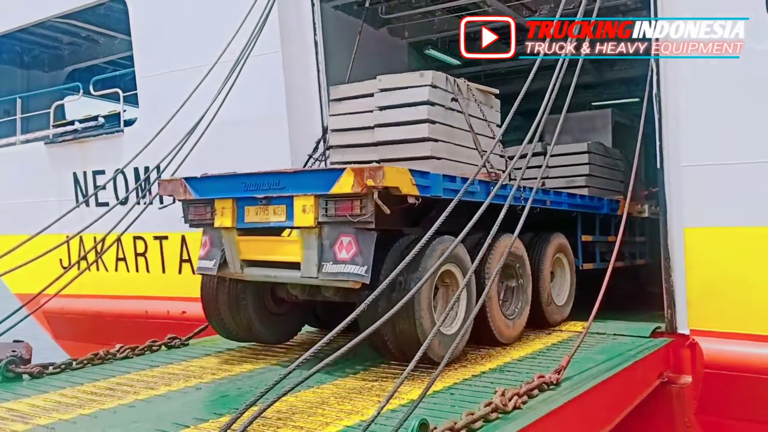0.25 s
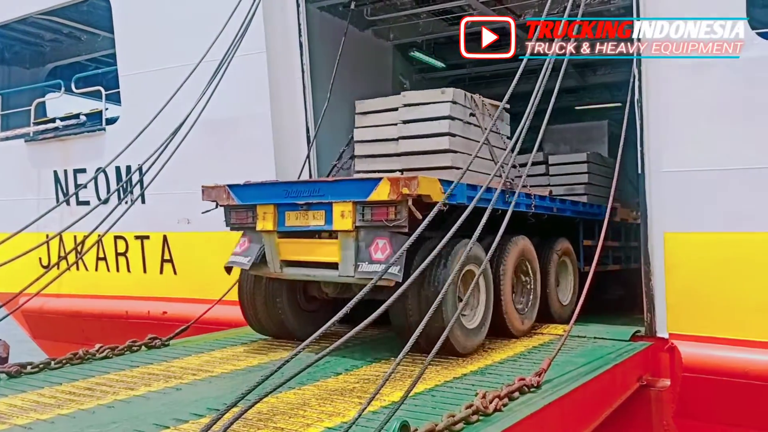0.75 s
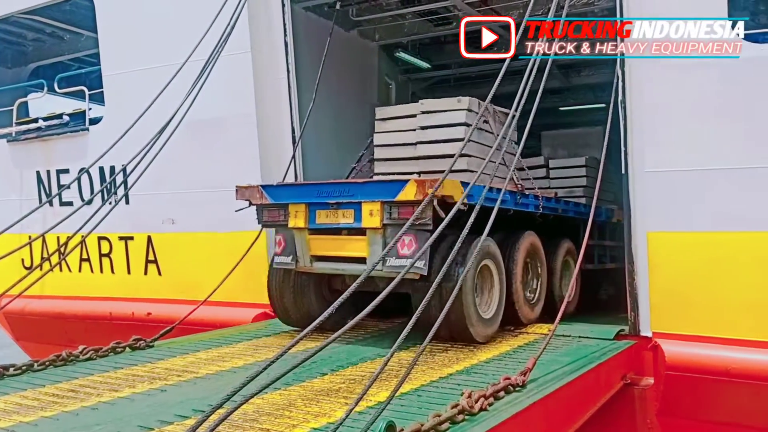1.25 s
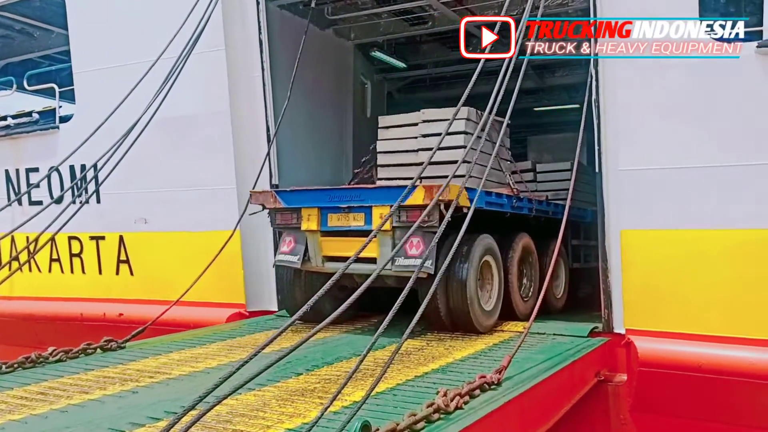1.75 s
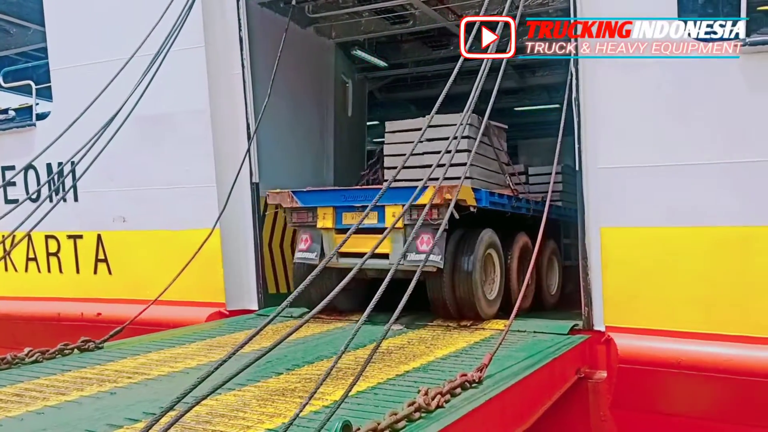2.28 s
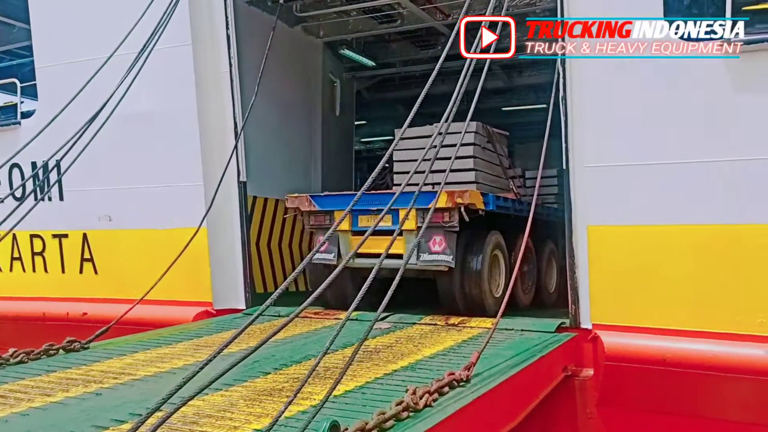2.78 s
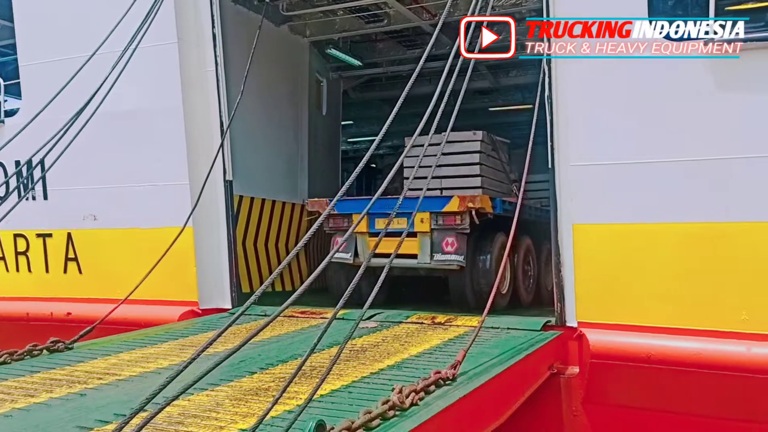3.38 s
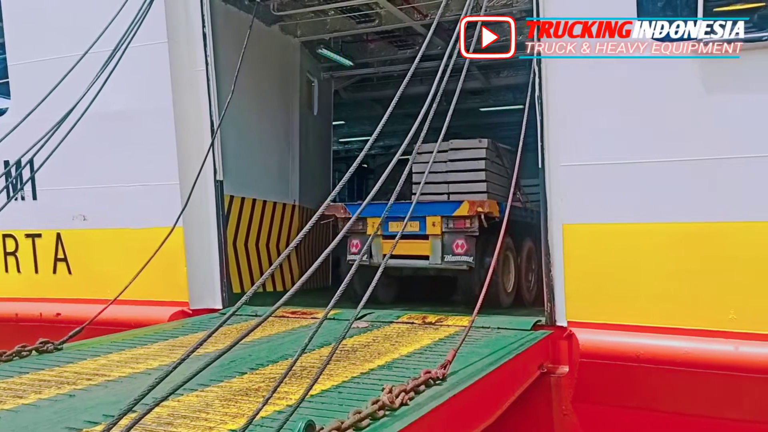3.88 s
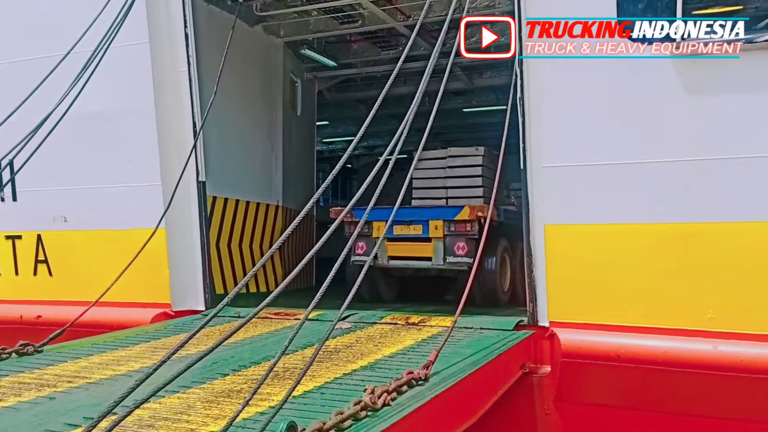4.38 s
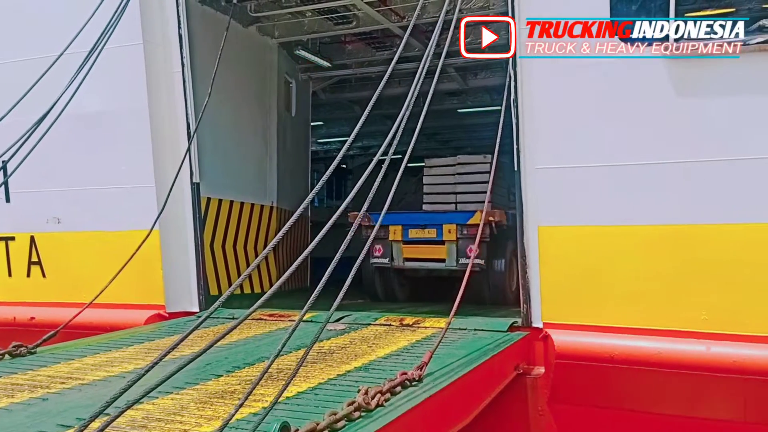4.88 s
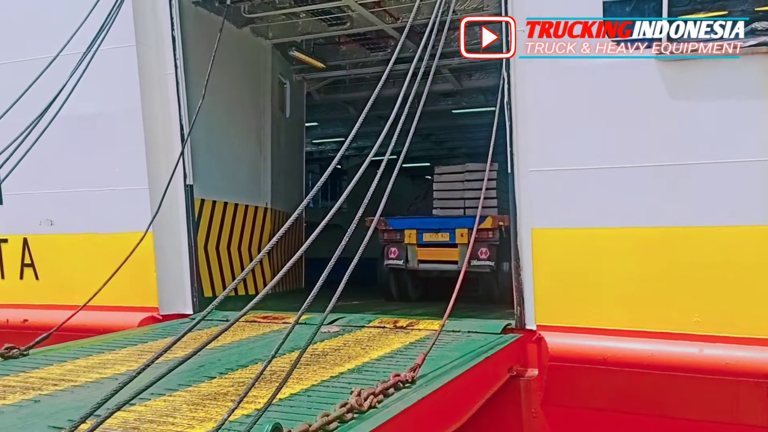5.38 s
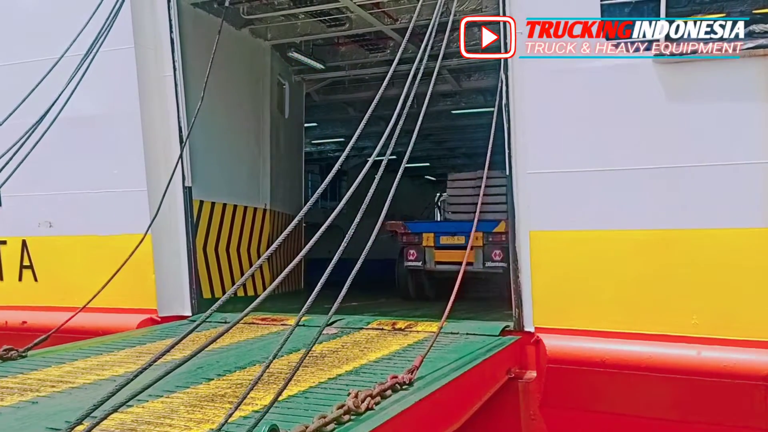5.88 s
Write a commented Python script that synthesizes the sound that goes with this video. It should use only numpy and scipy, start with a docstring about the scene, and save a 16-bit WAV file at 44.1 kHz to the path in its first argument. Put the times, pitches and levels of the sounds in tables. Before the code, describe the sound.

A loaded trailer rolls up a ribbed steel ramp into a ferry hold, heard close in stereo. A hollow low boom and rough tyre roar continue throughout. From 0.2 to 0.65 s loose plates slam, bounce and ring over a tyre thud, with light chain jangle. Around 1.0-1.9 s deep thuds mix with quick dry plate knocks, mostly left, and tiny steel squeals. A bright clang and chains strike near 1.9-2.1 s. From 2.4 to 3.3 s the rattle is densest, over heavy thumps. Then it thins: a big thud at 3.6, a few knocks around 4.3-4.5 with a short chain clink, and strong thuds until 5.0. A diesel clatters faintly behind, gradually quickening, clearer around 5.5 s with a fluttering hollow air whoosh. At 5.9-6.0 s a duller double slam, scrape, chain jangle and last thud sound.

```python
"""Trailer on a ferry ramp

A loaded flatbed trailer rolls up a ribbed steel ramp into the hold of a ferry, in stereo.
Tyres thud over the ribs (shaped noise and panel tones) and keep the ramp booming (filtered noise).
Loose plates slam and ring or rattle in short runs (struck modes and chattering noise).
Steel scrapes (wavering partials), and lashing chains jangle (showers of clicks into resonances).
Behind it all a diesel clatters and slowly gathers speed (noise pulsed by the firings), with a whoosh of air."""
import sys
import numpy as np
from scipy import signal
from scipy.fft import rfft, irfft, next_fast_len
from scipy.io import wavfile
from scipy.ndimage import uniform_filter1d

SR = 44100
rng = np.random.default_rng(int(sys.argv[2]) if len(sys.argv) > 2 else 0)


def to_wav(sig):
    """Store sig (one row per channel, or 1-D mono) as 16-bit WAV at the path in sys.argv[1].

    Samples outside -1..1 are clipped; the rate is SR.
    """
    pcm = np.clip(np.atleast_2d(sig), -1, 1) * 32767
    pcm = np.round(pcm).astype(np.int16)
    wavfile.write(sys.argv[1], SR, pcm.T)  # frames by channels


N = 270774
TIME = np.arange(N) / SR


def from_db(db):
    """Decibels to gain."""
    return 10 ** (np.asarray(db) / 20)


def rms_one(x):
    """Scale to unit power."""
    return x / np.sqrt(np.mean(x ** 2) + 1e-20)


def evened(x, size=SR // 4):
    """Hold a sound at unit power, leaving only its quick flutter."""
    return x / np.sqrt(uniform_filter1d(np.mean(x ** 2, axis=0), size=size) + 1e-20)


def shaped(x, envelope):
    """Put an envelope on a sound, with the energy that it would give a steady sound of unit power."""
    return rms_one(x * envelope) * np.sqrt(np.mean(envelope ** 2))


def fade(t, rise_s, t60_s):
    """A quick swell that dies away, by 60 dB in t60_s."""
    return (1 - np.exp(-t / rise_s)) * np.exp(-np.log(1000) * t / t60_s)


def in_time(rows):
    """Each column of a breakpoint curve, read at every sample."""
    s, *columns = np.transpose(rows)
    return [np.interp(TIME, s, column) for column in columns]


def drift(rate_hz, size=N):
    """Slow chance with a spread of 1: white noise through a two-pole lowpass."""
    r = np.exp(-2 * np.pi * rate_hz / SR)
    run_in = SR // 10
    white = rng.standard_normal(size + run_in)
    return rms_one(signal.lfilter([1], [1, -2 * r, r * r], white)[run_in:])


def noise(size, alike):
    """White noise at a left and a right microphone, with a given correlation between them."""
    mid, side = rng.standard_normal((2, size))
    alike = np.clip(alike, -1, 1)
    return np.sqrt(1 + alike) * mid + np.sqrt(1 - alike) * side * np.array([[1], [-1]])


def coloured(x, spectrum, tilt_db=0):
    """Shape a sound by a spectrum, tilted per octave about 1 kHz over two octaves either way."""
    size = next_fast_len(x.shape[-1])
    octave = np.log2(np.fft.rfftfreq(size, 1 / SR) + 1)
    hz, db = np.transpose(spectrum)
    curve_db = np.interp(octave, np.log2(hz), db)
    gain = from_db(curve_db + tilt_db * np.clip(octave - 10, -2, 2))
    return irfft(rfft(x, size) * gain, size)[..., :x.shape[-1]]


def resonate(x, modes):
    """Parallel resonances (pitch_hz, width_hz, level_db) with alternating signs."""
    out = 0
    for k, (hz, width_hz, db) in enumerate(modes):
        r = np.exp(-np.pi * width_hz / SR)
        gain = (-1) ** k * from_db(db) * (1 - r * r) / 2
        poles = [1, -2 * r * np.cos(2 * np.pi * hz / SR), r * r]
        out = out + gain * signal.lfilter([1, 0, -1], poles, x)
    return out


def struck(modes, size):
    """One click into a set of modes, with a peak of 1."""
    ringing = resonate(signal.unit_impulse(size), modes)
    return ringing / np.abs(ringing).max()


def wavering(hz, wander_hz):
    """A unit-power tone on a pitch track, its phase wandering separately at each microphone."""
    turn = 2 * np.pi * np.cumsum(hz) / SR + rng.uniform(0, 2 * np.pi)
    sides = [np.sin(turn + drift(wander_hz, size=SR // 2)[:len(hz)]) for _ in range(2)]
    return rms_one(np.array(sides))


def panned(db):
    """Left and right gains of equal total power for a left minus right level."""
    ratio = from_db(np.atleast_1d(db))
    return np.array([ratio, np.ones_like(ratio)]) * np.sqrt(2 / (1 + ratio ** 2))


def add(track, start_s, sound):
    """Mix a sound in at a time."""
    at = max(0, round(start_s * SR))
    track[:, at:at + sound.shape[1]] += sound[:, :max(0, N - at)]


# a tyre drops off a rib: start_s [s], level_db [dB], pitch_hz of the ramp panel [Hz]
TYRE_DROPS = [(0.359, -9, 358), (.846, -6.5, 129.2), (.955, -5.5, 217), (1.139, -12, 358),
              (1.435, -10.5, 140.2), (1.661, -13, 187.8), (1.716, -9, 107.5), (1.925, -7, 193),
              (2.35, -6, 144.7), (2.459, -10, 114), (2.56, -5.5, 259.3), (2.72, -4.5, 108),
              (2.87, -11, 252), (3.051, -8.5, 131.3), (3.582, -3.5, 105.6), (3.807, -9, 140),
              (3.86, -12, 371.4), (4.109, -7.5, 231.3), (4.33, -7.5, 190.6), (4.491, -6, 111.7),
              (4.722, -10, 207), (4.906, -4.5, 125.4), (4.969, -5.5, 258), (6.0, -7, 229)]
# the load rolling up the ramp: time_s [s], boom_db and roar_db before their fixed lifts [dB]
ROLLING_LOAD = [(0.0, -18, -24), (0.53, -22, -25.5), (1.13, -22.5, -20.5), (1.4, -20, -27.5),
                (1.76, -20, -20.5), (2.05, -23.5, -24), (3.3, -20, -24.5), (4.14, -19.5, -23),
                (5.51, -22, -27), (5.9, -22, -24), (6.14, -19, -21)]
# spectra of the drop, the hollow ramp and the tread: pitch_hz [Hz], relative level_db [dB per Hz]
DROP_SPECTRUM = [(30, -28), (60, -8.5), (95, 6), (200, 5.5), (350, -4.5), (550, -2.5), (1000, -19.5),
                 (3000, -46)]
BOOM_SPECTRUM = [(38, -26), (55, -19), (75, -5.5), (100, 2), (150, -0.5), (230, -4), (330, -22),
                 (600, -19.5), (1500, -70.5)]
ROAR_SPECTRUM = [(100, -6.5), (280, 5), (400, 1), (600, -7.5), (850, -7.5), (1200, -15.5), (2000, -23.5),
                 (4000, -33), (10000, -69)]


def tyres(wander_hz=20, swell_s=0.0096, thud_t60_s=0.24,
          boom_db=3.0, roar_db=4.0, lumpy_db=3.0, surge_db=0.5):
    """Drops thud, each ringing its own panel; the tread drums on the ribs and keeps the hollow ramp booming."""
    out = np.zeros((2, N))
    t = TIME[:SR // 3]
    boom_level, roar_level = in_time(ROLLING_LOAD)
    surging = noise(N, alike=0.4) * from_db(surge_db * drift(52))
    boom = from_db(boom_level + boom_db) * evened(coloured(surging, BOOM_SPECTRUM))
    lumpy = noise(N, alike=0.091) * from_db(lumpy_db * drift(27))
    roar = from_db(roar_level + roar_db) * evened(coloured(lumpy, ROAR_SPECTRUM))
    for start_s, db, hz in TYRE_DROPS:
        body = rms_one(coloured(noise(len(t), alike=0.1), DROP_SPECTRUM))
        panel = wavering(np.full(len(t), hz), wander_hz)
        overtone = from_db(-8.5) * wavering(np.full(len(t), 1.8 * hz), wander_hz)
        thud = shaped(body + panel + overtone, fade(t, swell_s, thud_t60_s))
        add(out, start_s, from_db(db) * thud)
    return out + boom + roar


# strong modes of a loose plate, before scatter and tilt: pitch_hz [Hz], width_hz [Hz], level_db [dB]
PLATE_MODES = [(393, 85, 3.5), (647, 103, 8.5), (790, 210, 6), (1110, 380, -1.5), (1332, 24, 2.5),
               (1596, 24, 4.5), (1980, 136, -2.5), (3370, 52, -25)]
# spectrum of its many dense modes, before tilt: pitch_hz [Hz], relative level_db [dB per Hz]
PLATE_SPECTRUM = [(100, -28), (250, 8), (380, 0), (480, -1), (620, 5.5), (820, 5.5), (1250, -1.5),
                  (1750, -5), (2600, -11.5), (4200, -21.5), (6000, -30), (15000, -59)]


def blow(tilt_db, t60_s, crack_db, snap_db, dense_db, modal_db, swell_s, chatter_db, snap_t60_s=0.029):
    """A blow cracks through the plate's main modes and chatters on; their pitches scatter from blow to blow."""
    t = TIME[:int(SR * np.clip(1.2 * t60_s, .15, .7))]
    modes = [(hz * (1 + 0.054 * rng.normal()), width_hz, db + tilt_db * np.log2(hz / 1000))
             for hz, width_hz, db in PLATE_MODES]
    crack = struck(modes, len(t))
    hiss = coloured(noise(SR, alike=0.2)[:, :len(t)], PLATE_SPECTRUM, tilt_db)
    snap = shaped(hiss, fade(t, .0009, snap_t60_s))
    # the bouncing contact feeds both the many dense modes and the few strong ones
    contact = from_db(chatter_db * drift(78, size=SR))
    tail = fade(t, swell_s, t60_s)
    dense_feed = (noise(SR, alike=0.52) * contact)[:, :len(t)]
    dense = shaped(coloured(dense_feed, PLATE_SPECTRUM, tilt_db), tail)
    modal_feed = (noise(SR, alike=0.15) * contact)[:, :len(t)]
    singing = shaped(resonate(modal_feed, modes), tail)
    return (from_db(crack_db) * crack + from_db(snap_db) * snap
            + from_db(dense_db) * dense + from_db(modal_db) * singing)


# a free plate slams down: start_s [s], level_db [dB], brightness_db [dB per octave],
# t60_s [s], clang pitch_hz [Hz]
PLATE_SLAMS = [(0.184, -10.5, -2, 0.66, 885), (.352, -14.5, -14, 0.4, 956), (0.565, -19.5, -3, 0.98, 892),
               (.637, -13.5, -2, 0.63, 1434), (1.076, -14, -0.5, 0.71, 1010), (1.926, -18, 2.5, 1, 1620),
               (2.078, -11.5, -0.5, 0.68, 798), (5.917, -12.5, -14, 0.54, 487),
               (5.994, -14.5, -14, 0.9, 820)]


def slams(rebound_s=.028, rebound_db=-3.5, clang_db=-4.5, clang_wander_hz=120, clang_t60_s=0.21):
    """Free plates fall shut, clang at a pitch of their own, bounce once and ring on."""
    out = np.zeros((2, N))
    t = TIME[:SR // 3]
    for start_s, db, tilt_db, t60_s, hz in PLATE_SLAMS:
        for delay_s, change_db in ((0, 0), (rebound_s, rebound_db)):
            hit = blow(tilt_db, t60_s, crack_db=4.5, snap_db=1.0, dense_db=-5.5, modal_db=-5.5,
                       swell_s=0.0064, chatter_db=2.0)
            add(out, start_s + delay_s, from_db(db + change_db) * hit)
        clang = wavering(np.full(len(t), hz), clang_wander_hz) * fade(t, 0.0018, clang_t60_s)
        add(out, start_s, from_db(db + clang_db) * clang)
    return out


# a plate knocks under a tyre: start_s [s], level_db [dB], brightness_db [dB per octave]
PLATE_KNOCKS = [(0.376, -13.5, 1), (.984, -12.5, 1), (1.142, -16.5, -2.5), (1.187, -13, -0.5),
                (1.215, -15, 2.5), (1.266, -14, -2.5), (1.284, -14, -1), (1.34, -12.5, -2.5),
                (1.391, -17, -8), (1.515, -15.5, -4), (1.537, -9, -1), (1.588, -26.5, 7), (1.617, -22, 8),
                (1.702, -13, 2.5), (1.735, -11, 4), (1.774, -12.5, 2.5), (1.811, -16, 2.5),
                (1.887, -10.5, 1), (2.396, -15, -4), (2.407, -16.5, 3), (2.52, -12.5, -1.5),
                (2.561, -15, 0.5), (2.585, -13, 2), (2.603, -13, -1), (2.611, -14, -2), (2.724, -14.5, 1.5),
                (2.747, -12, 5.5), (2.772, -12, 2.5), (2.788, -12.5, 1), (2.83, -11.5, -8),
                (2.858, -13, 2.5), (2.893, -15, 1.5), (3.02, -14, -0.5), (3.086, -10, -2),
                (3.107, -18, 2.5), (3.12, -8.5, 2), (3.196, -14, -1.5), (3.241, -10, -12), (3.291, -16, -4),
                (3.675, -13, -15), (4.289, -10.5, -1), (4.316, -11, -12), (4.517, -17, -4)]


def rattles(graze_db=-5.0, t60_s=0.093, base_pan_db=19.5, pan_per_brightness=2.5):
    """Plates pinned by a tyre graze, then knock, in quick dry runs, mostly on the left."""
    out = np.zeros((2, N))
    for start_s, db, tilt_db in PLATE_KNOCKS:
        # left minus right; the brighter plates lie further left
        pan_db = base_pan_db + pan_per_brightness * tilt_db
        for lead_s, change_db in ((rng.uniform(.004, .014), graze_db), (0, 0)):
            hit = blow(tilt_db, t60_s, crack_db=1.0, snap_db=1.0, dense_db=-6.5, modal_db=-8.0,
                       swell_s=0.0027, chatter_db=3.0)
            add(out, start_s - lead_s, from_db(db + change_db) * hit * panned(pan_db))
    return out


# steel scraping on steel: start_s [s], length_s [s], starting pitch_hz [Hz], level_db [dB]
STEEL_SCRAPES = [(0.966, 0.027, 3146, -26.5), (1.041, 0.065, 2210, -29), (1.928, .045, 3930, -28),
                 (5.919, .09, 2813, -25.5)]
# partials of the squeal: multiple of the pitch [ratio], level_db [dB]
SQUEAL_PARTIALS = [(1.003, 7.5), (1.333, -1), (1.552, -9), (1.996, -6)]
# spectrum of small steel, for the grit here and the chain links below:
# pitch_hz [Hz], relative level_db [dB per Hz]
LINK_SPECTRUM = [(400, -25), (1200, -11), (1700, 9.5), (2500, -2), (3700, 4.5), (6700, -2), (8500, -4.5),
                 (15000, -18)]


def scrapes(wander_hz=520, glide=0.073, slip_db=0.5, grit_db=-4.5, rise_s=0.0055, pan_db=-7.0):
    """Steel sticks and slips: a gritty squeal that bites, rises in pitch and lets go."""
    out = np.zeros((2, N))
    t = TIME[:SR // 4]
    for start_s, length_s, hz, db in STEEL_SCRAPES:
        pitch = hz * (1 + glide * np.minimum(t / length_s, 1))
        squeal = rms_one(sum(from_db(level_db) * wavering(pitch * ratio, wander_hz)
                             for ratio, level_db in SQUEAL_PARTIALS))
        grit = rms_one(coloured(noise(len(t), alike=0.4), LINK_SPECTRUM))
        slip = from_db(slip_db * drift(150, size=len(t)))
        pressure = (1 - np.exp(-t / rise_s)) * np.exp(-(t / length_s) ** 2) * slip
        add(out, start_s, from_db(db) * (squeal + from_db(grit_db) * grit) * pressure)
    return out * panned(pan_db)


# chains snatched tight: start_s [s], level_db [dB], t60_s [s], pitch_hz of the ringing links [Hz]
CHAIN_SNATCHES = [(0.559, -26.5, 0.38, 4320), (0.636, -19.5, 0.52, 3770), (1.075, -26, 0.7, 2900),
                  (1.95, -20.5, 0.47, 4080), (2.075, -23.5, 0.61, 3450), (4.497, -20.5, 0.13, 4500),
                  (5.927, -21, 0.4, 3830)]


def chains(links_per_s=160, click_t60_s=0.014, wash=0.93, ring_db=-13.0, ring_width_hz=90, pan_db=-3.5):
    """Link strikes link in a quick shower that dies down; the links ring at a few pitches."""
    out = np.zeros((2, N))
    t = TIME[:SR * 2 // 3]
    for start_s, db, t60_s, hz in CHAIN_SNATCHES:
        strikes = (rng.random(len(t)) < links_per_s / SR) * rng.uniform(0.1, 1, len(t))
        clicks = signal.lfilter([1], [1, -from_db(-60 / (click_t60_s * SR))], strikes)
        shower = noise(len(t), alike=0.14) * (wash + clicks)
        ringing = resonate(shower, [(hz, ring_width_hz, 0), (hz * 1.13, ring_width_hz, -4),
                                    (6750, ring_width_hz, -4), (7950, ring_width_hz, -6)])
        links = rms_one(coloured(shower, LINK_SPECTRUM)) + from_db(ring_db) * rms_one(ringing)
        add(out, start_s, from_db(db) * links * fade(t, 0.0012, t60_s) * panned(pan_db))
    return out


# the whole diesel before the fixed gains of its parts: time_s [s], level_db [dB]
DIESEL_LEVEL = [(0.0, -39), (0.97, -40.5), (1.18, -58), (1.4, -46), (2.17, -40.5), (2.79, -46),
                (3.33, -43.5), (3.45, -40.8), (4.33, -40.5), (5.25, -39), (5.51, -35.5), (5.8, -36.5),
                (6.14, -39.5)]
# its balance: time_s [s], knock and exhaust against the ticks before fixed gains [dB],
# left minus right pan_db [dB]
DIESEL_BALANCE = [(0, -1, -7.5), (3.3, 0, -9.5), (3.8, 3.5, 1), (4.4, 3, -6.5), (4.9, 6.5, -3),
                  (5.4, 1, -0.5), (6.14, 2.5, 1.5)]
# resonances of the engine block: pitch_hz [Hz], width_hz [Hz], level_db [dB]
BLOCK_MODES = [(1206, 220, 10.5), (2046, 430, 4.5), (3062, 40, 8), (3430, 770, -3.5)]
# spectrum of the injector ticks: pitch_hz [Hz], relative level_db [dB per Hz]
INJECTOR_SPECTRUM = [(500, 14.5), (1500, 4), (2800, 5.5), (3600, 1.5), (4500, 3.5), (6700, 2), (7500, 1.5),
                     (8400, -2.5), (12000, -8.5), (15000, -5)]


def diesel(firings_per_s=34, gain_per_s2=2.3, pulse_db=0.85, knock_pulse_db=1.5,
           tick_db=10.5, knock_db=4.5, exhaust_db=-5.5, lag_s=0.000456):
    """Each firing knocks the block and ticks the injectors; the exhaust throbs at the same rate."""
    rate = firings_per_s + gain_per_s2 * TIME
    balance_db, pan_db = in_time(DIESEL_BALANCE)
    level_db, = in_time(DIESEL_LEVEL)
    turn = 2 * np.pi * np.cumsum(rate) / SR
    firing = (np.sin(turn) + 0.48 * np.sin(2 * turn)) * (1 + 0.5 * drift(46))
    ticks = rms_one(coloured(noise(N, alike=0.24) * from_db(pulse_db * firing), INJECTOR_SPECTRUM))
    knock = rms_one(resonate(noise(N, alike=0.67) * from_db(knock_pulse_db * firing), BLOCK_MODES))
    exhaust = from_db(exhaust_db) * np.sin(turn)
    combustion = from_db(balance_db) * (from_db(knock_db) * knock + exhaust)
    left, right = from_db(level_db) * (from_db(tick_db) * ticks + combustion)
    # the sound reaches the left microphone first
    late_right = np.interp(TIME - lag_s, TIME, right)
    return np.array([left, late_right]) * panned(pan_db)


def intake(peak_s=5.66, spread_s=0.74, db=-34.5, hz=1950, width_hz=400, flutter_db=4.0):
    """A hollow whoosh of air, one broad resonance, swells and flutters as the engine pulls into the hold."""
    air = rms_one(resonate(noise(N, alike=0.42), [(hz, width_hz, 0)]))
    swell = np.exp(-((TIME - peak_s) / spread_s) ** 2)
    return from_db(db + flutter_db * drift(8)) * air * swell


def scene():
    """Tyres and plates on the ramp, then steel and chains, with the engine behind."""
    return tyres() + slams() + rattles() + scrapes() + chains() + diesel() + intake()


def gain_control(x, threshold_db=-9.5, squeeze=0.64, release_db_per_s=170, makeup_db=0.5):
    """Loud moments turn everything down for an instant."""
    level_db = 10 * np.log10(uniform_filter1d(np.mean(x ** 2, axis=0), size=400) + 1e-9)
    over_db = np.maximum(level_db - threshold_db, 0)
    # hold each excess, letting it go at a steady rate
    release_db = release_db_per_s * TIME
    held_db = np.maximum.accumulate(over_db + release_db) - release_db
    return x * from_db(makeup_db - squeeze * uniform_filter1d(held_db, size=200))


# overall tone curve, thin deep bass, dips near 5 and 11 kHz: pitch_hz [Hz], level_db [dB]
TONE_CURVE = [(25, -19), (55, -1.5), (4600, 1.5), (4900, -7), (6000, -4.5), (6250, 2.5), (8400, 1.5),
              (8900, -18.5), (11200, -50), (11800, 0), (15000, -8.5)]


def record(dry):
    """The recorder rides the gain and rounds the peaks; then a curve shapes the tone and a filter cuts the top."""
    rounded = 1.4 * np.tanh(gain_control(dry) / 1.4)
    # 70 dB down from 16.4 kHz up
    top_cut = signal.cheby2(16, 70, 16400, fs=SR, output="sos")
    return signal.sosfilt(top_cut, coloured(rounded, TONE_CURVE))


dry = scene()
out = record(dry)
to_wav(out)
```